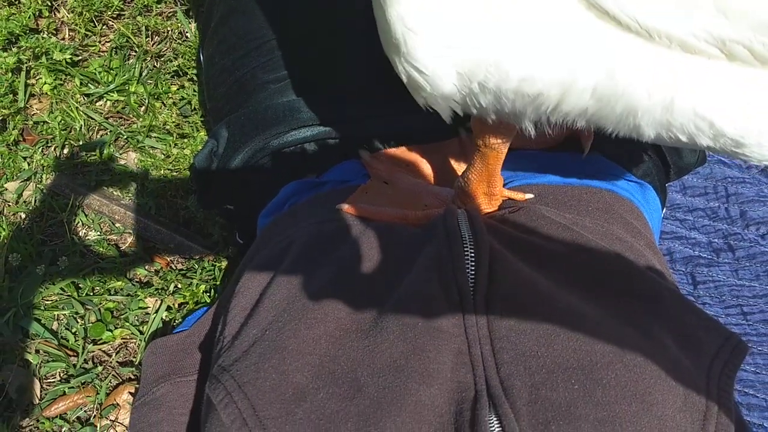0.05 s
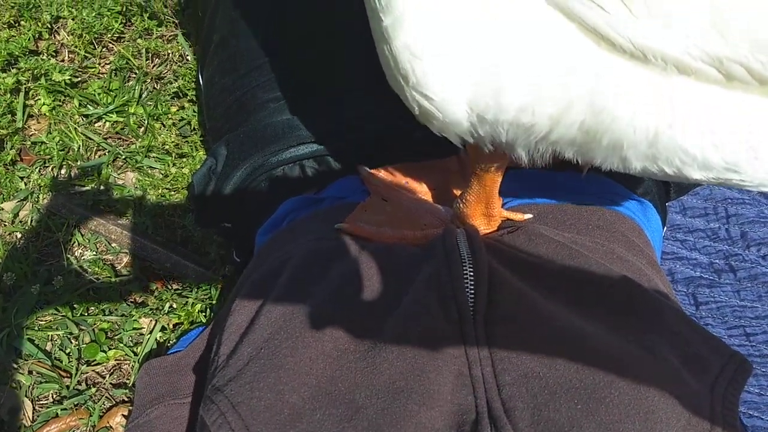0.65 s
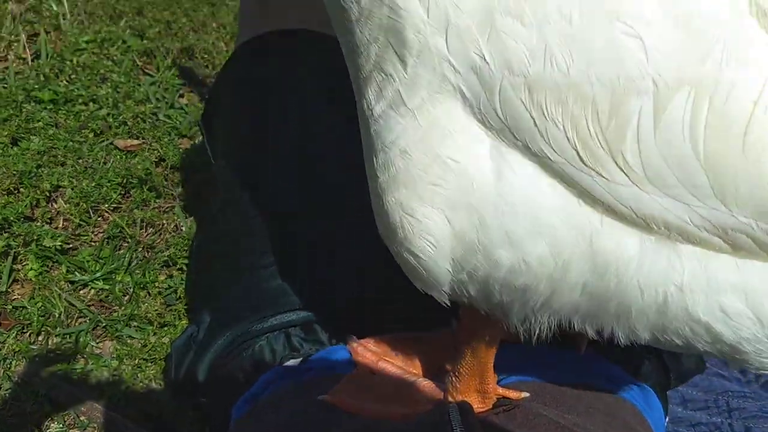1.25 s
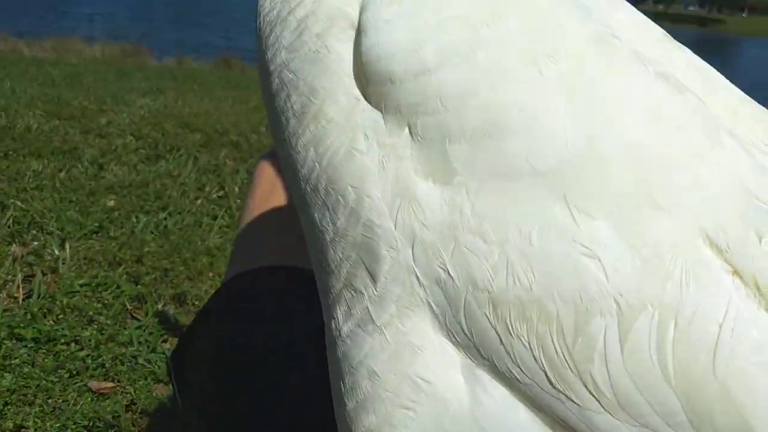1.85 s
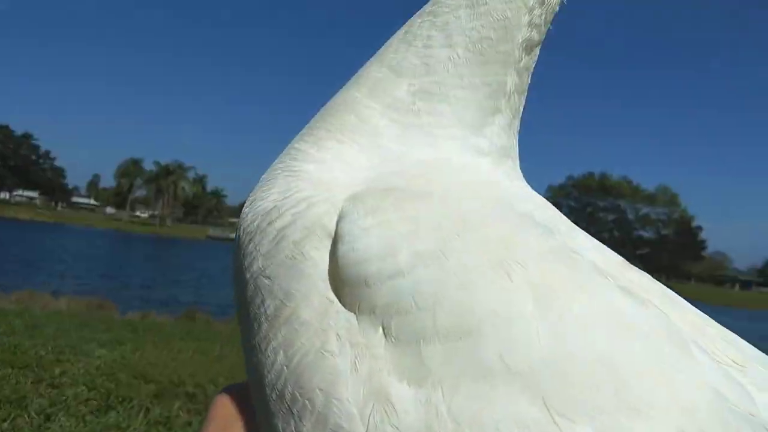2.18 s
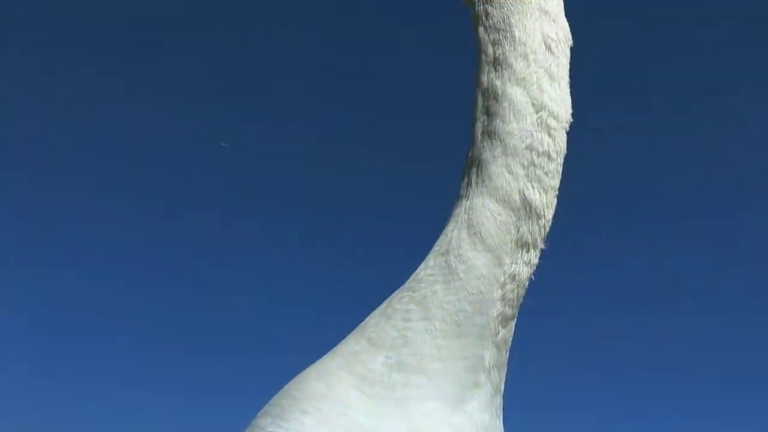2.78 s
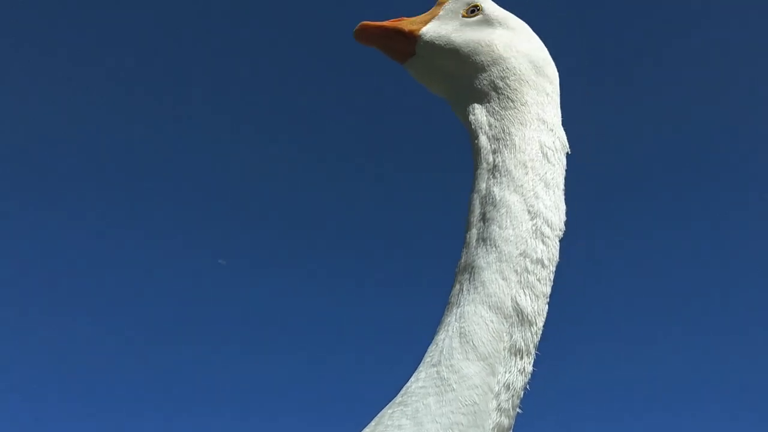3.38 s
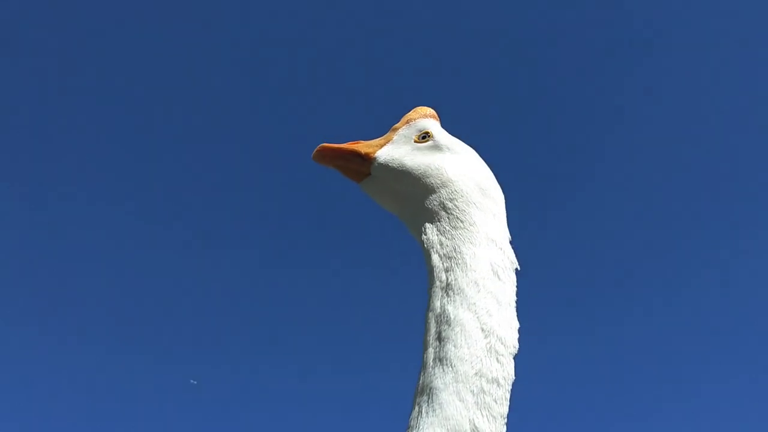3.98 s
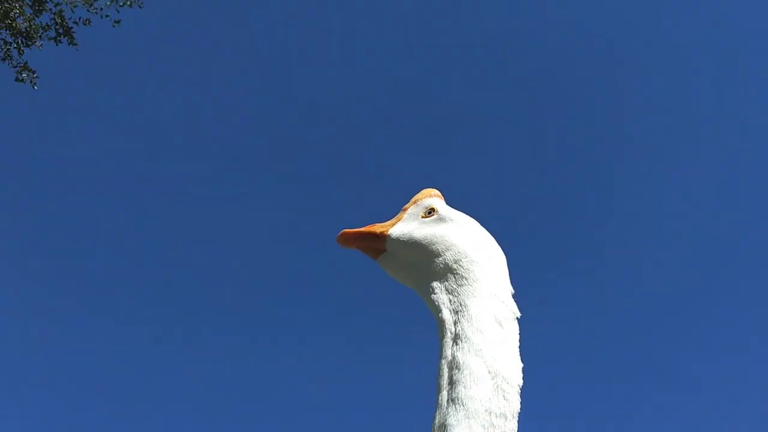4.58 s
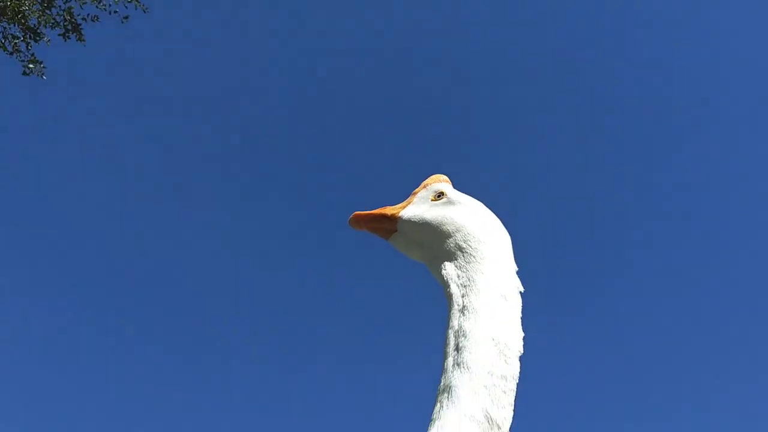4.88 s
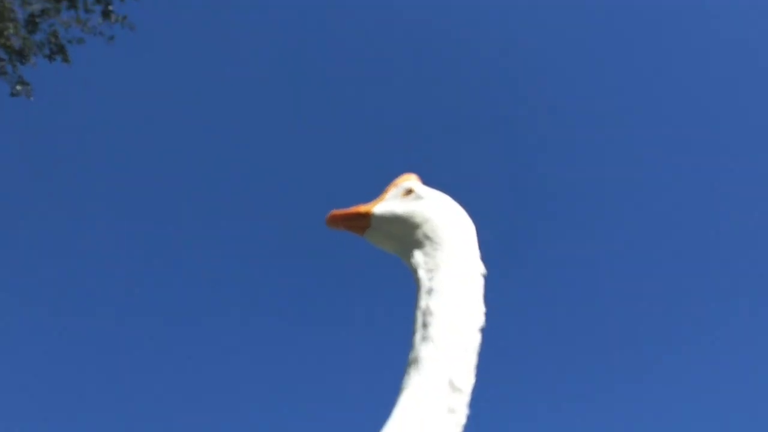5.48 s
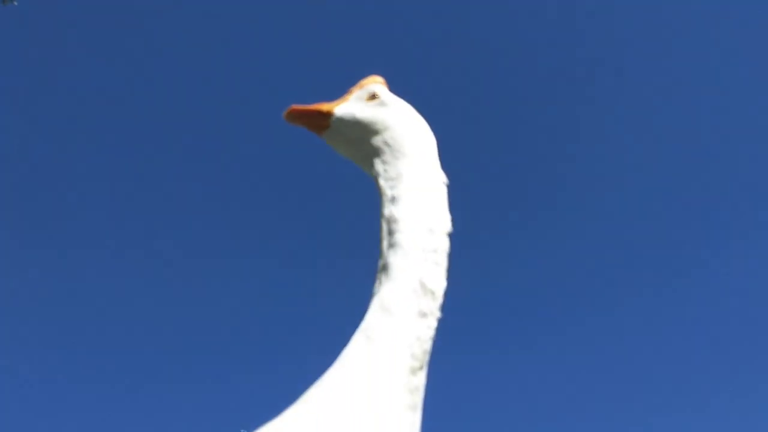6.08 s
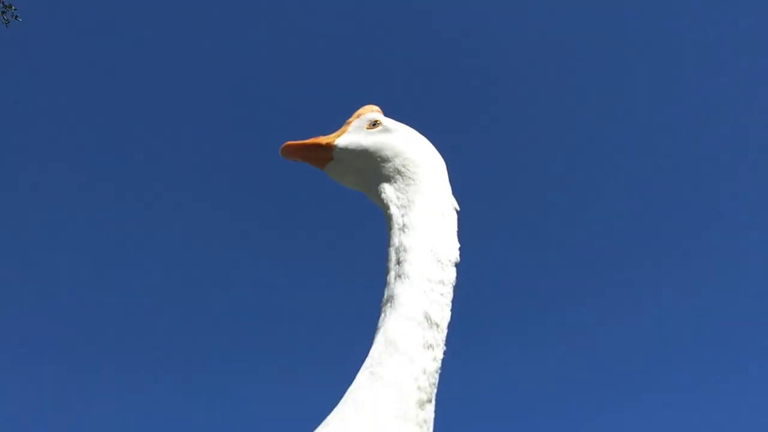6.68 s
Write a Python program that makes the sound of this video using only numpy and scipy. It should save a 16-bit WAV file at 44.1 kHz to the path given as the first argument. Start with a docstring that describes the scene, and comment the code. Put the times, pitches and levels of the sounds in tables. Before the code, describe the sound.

Outdoors in the open, a goose very close to a hand-held microphone gives five loud, evenly spaced honks. They are short, shrill and raspy, each starting gruffly, holding a high squeal and then breaking downward. Low, uneven wind buffeting and a faint hiss of air run underneath, easing briefly midway. One small, dry tick on the microphone falls between the first two calls.

```python
"""Goose honking in gusty wind

A domestic goose honks five times at arm's length, outdoors; the first honk is already under way.
Membranes in its syrinx slap out a rough bark, jump to a held, beating squeal, swoop to a crest and
tumble through lower registers, over a rasp of forced air. Wind buffets mainly one port of a
microphone pair, and something ticks once against the hand-held camera."""
import sys
import numpy as np
from scipy import signal
from scipy.fft import rfft, irfft, next_fast_len
from scipy.io import wavfile
from scipy.ndimage import uniform_filter1d

SR = 44100
rng = np.random.default_rng(int(sys.argv[2]) if len(sys.argv) > 2 else 0)


def pcm_store(signal):
    """Save signal as 16-bit PCM."""
    levels = np.round(np.clip(np.atleast_2d(signal), -1, 1) * 32767)
    wavfile.write(sys.argv[1], SR, levels.astype(np.int16).T)


N = 297234
TIME = np.arange(N) / SR
BAND_LIMIT_HZ = 15830

# honks: start/s, crest/s, yelp/s, end/s, opening effort/dB, squeal effort/dB, fall effort/dB,
# squeal pitch/Hz, brightness/(dB/octave), nasal ring/Hz
HONKS = [(-.29, .066, .118, .24, 0, -2, 2, 1421, -2, 3230),
         (1.17, 1.516, 1.573, 1.70, -1.5, -6, -1.5, 1431, -1.5, 3380),
         (2.589, 2.949, 3.006, 3.113, -1, -3.5, -2, 1422, 0, 3200),
         (4.149, 4.514, 4.579, 4.695, -.5, 0, -2.5, 1415, 1, 3150),
         (5.813, 6.197, 6.256, 6.37, 2, 1.5, -0.5, 1408, -1, 3130)]
# opening bark of the typical honk: length/s, level/dB, first pulse rate/Hz, last pulse rate/Hz
BARK = (.066, -12.5, 137.5, 159)
# register contours of the typical honk: t/s, pitch/Hz, level/dB
STEP = [(.053, 1156, -20), (.08, 1164, -12.5), (.107, 1215, -18.5)]
HOLD = [(.103, 1.006, -18.5), (.115, 1, -12.5), (.2, .998, -11), (.315, 1.01, -14.5), (.338, 1.028, -10.5),
        (.37, 1.045, -26)]  # pitch as a ratio to the honk's squeal pitch
SWOOP = [(.322, 1433, -25), (.345, 1542, -16.5), (.363, 1737, -24.5)]
CREST = [(.34, 1718, -22), (.359, 1764, -14), (.385, 1768, -31)]
BREAK = [(.353, 880, -36.5), (.371, 878, -13), (.388, 830, -29)]
LOW = [(.372, 715.5, -25), (.397, 670, -18), (.42, 661, -28.5)]
YELP = [(.418, 1177, -19), (.442, 1135, -23.5), (.487, 1067, -36)]
SIGH = [(.472, 907, -31.5), (.497, 881, -28), (.533, 805, -40)]
# wind strength: t/s, level/dB
WIND_STRENGTH = [(0.0, -20), (0.12, -25.5), (0.4, -16), (0.52, -28), (0.64, -20), (1.04, -30),
                 (1.12, -17.5), (1.28, -25.5), (1.68, -21), (2.0, -32), (2.12, -22), (2.76, -22),
                 (2.84, -31), (3.12, -31), (3.2, -51), (3.32, -32.5), (3.48, -37.5), (4.04, -20),
                 (4.2, -30), (4.72, -20), (4.96, -28.8), (5.32, -22), (6.2, -26.5), (6.72, -25.5)]
# turbulence spectrum: f/Hz, level/dB
RUMBLE_SPECTRUM = [(20, -37), (35, -10), (60, 4.5), (100, 0.5), (160, -1.5), (250, -9), (400, -17.5),
                   (600, -34), (900, -43), (2000, -74)]


def goose(tone_db=-2.5, rasp_db=-6.5, waver_db=1.37):
    """Each honk is a bark, then a run through the syrinx's registers with a rasp of air."""
    # contour, beat rate/pitch, beat depth/rad, jitter/pitch, undertone/pitch, undertone level/dB,
    # slope past the listed harmonics/(dB/octave), harmonic levels/dB
    registers = [ (STEP, .13, 0.12, 0.0038, .39, -26.5, -33, [4, -8, -18.5, -30, -36, -49.5]),
                 (HOLD, .195, .38, .0032, .54, -27, -12, [0, -8, -16.5, -27, -35, -42]),
                 (SWOOP, 0.14, .14, 0.0055, 0.36, -28, -15, [-9, -4, -17.5, -13.5, -18, -25.5]),
                 (CREST, 0.22, 0.21, 0.0021, 0.37, -21.5, -17.5, [3.5, -9, -12.5, -17.5, -39, -38]),
                 (BREAK, .22, 0.086, 0.0087, 1, -15, -33.5, [-0.5, -5.5, -10.5, -23.5, -38.5, -29.5]),
                 (LOW, .165, 0.11, 0.0059, 0.31, -36.5, -16, [3, 1.5, 0, -16, -11.5, -6.5, -51.5, -21]),
                 (YELP, 0.26, 0.14, 0.013, 0.6, -19.5, -32, [3.5, 5, -16, -33.5, -25, -27]),
                 (SIGH, 0.34, 0.08, 0.0098, 0.56, -25.5, -8, [7, -7.5, -15, -17.5, -26, -40])]
    tones, barks = np.zeros((2, N))
    bark_s, bark_db, *rates_hz = BARK
    for honk in HONKS:
        start_s, _, _, _, opening_db, _, _, squeal_hz, bright_db, _ = honk
        bark_end_s, _ = stretch(honk, bark_s)
        add(barks, *bark(start_s, bark_end_s, bark_db + opening_db, *rates_hz))
        for contour, *voice in registers:
            typical_s, pitch, db = np.transpose(contour)
            times_s, effort_db = stretch(honk, typical_s)
            hz = pitch * squeal_hz if contour == HOLD else pitch
            add(tones, *syrinx(times_s, hz, db + effort_db, bright_db, *voice))
    breath = gain_of(rasp_db) * rasp(tones)
    nasal_hz = np.interp(TIME, [honk[1] for honk in HONKS], [honk[-1] for honk in HONKS])
    tones = tones + 1.23 * resonate(tones, nasal_hz, width_hz=240)  # ring of the open bill
    pressure = gain_of(waver_db * wander(N, 18))
    return pressure * (gain_of(tone_db) * tones + breath) + barks


def stretch(honk, typical_s, squeal_s=(.11, .32), crest_s=.36, yelp_s=.418, end_s=.536):
    """Maps moments of the typical honk to this honk's times/s and efforts/dB."""
    opening_db, squeal_db, fall_db = honk[4:7]
    effort_db = np.interp(typical_s, (BARK[0], *squeal_s, crest_s),
                          (opening_db, squeal_db, squeal_db, fall_db))
    return np.interp(typical_s, (0, crest_s, yelp_s, end_s), honk[:4]), effort_db


def syrinx(times_s, hz, db, bright_db, beat_ratio, depth_rad, jitter, under_ratio, under_db,
           slope_db, harmonics_db, shimmer_db=1.5, tension_db=1.5):
    """One membrane sets the pitch; a second vibration beats against it, adding sidebands."""
    edge_s = .012
    t = np.arange(times_s[0] - edge_s / 2, times_s[-1] + edge_s / 2, 1 / SR)
    n = len(t)
    pitch_hz = np.interp(t, times_s, hz)
    tension = np.tanh((pitch_hz / np.median(pitch_hz) - 1) / .03)
    tilt_db = bright_db + tension_db * tension  # tighter is higher and brighter
    beat_phase = 2 * np.pi * np.cumsum(beat_ratio * pitch_hz * (1 + .03 * wander(n, 90))) / SR
    phase = 2 * np.pi * np.cumsum(pitch_hz * (1 + jitter * wander(n, 260))) / SR
    swing_rad = depth_rad * (1 + .35 * wander(n, 30))
    under_gain = gain_of(under_db + 7.26 * wander(n, 22))
    tone = under_gain * np.cos(under_ratio * phase + .5 * wander(n, 55))
    phase = phase + swing_rad * np.sin(beat_phase)
    for k in range(1, int(BAND_LIMIT_HZ / hz.max()) + 1):
        listed = min(k, len(harmonics_db))
        level_db = harmonics_db[listed - 1] + slope_db * np.log2(k / listed) + tilt_db * np.log2(k)
        angle = k * phase + 2 * np.pi * rng.random()
        upper_sideband = .27 * swing_rad * np.cos(angle + 2 * beat_phase)
        tone += gain_of(level_db) * (np.cos(angle) + upper_sideband)
    level = gain_of(np.interp(t, times_s, db) + shimmer_db * wander(n, 180))
    beating = 1 - .21 * swing_rad * np.cos(beat_phase)
    return t[0], np.sqrt(2) * level * beating * tone * fade(t, times_s[0], times_s[-1], edge_s)


def bark(start_s, end_s, db, first_hz, last_hz, jitter=.05, roughness=.4, easing_db=4):
    """Slack membranes slap irregularly into the windpipe; as they tighten, slaps grow in between."""
    # throat during a bark: f/Hz, level/dB
    throat = [(250, -24), (450, -7.5), (600, -1.5), (750, -8), (900, 3), (1080, -5), (1350, -0.5),
              (1650, -6.5), (2200, -8.5), (2800, -12), (4200, -30.5), (7500, -41), (10000, -72),
              (15000, -74.5)]
    t = np.arange(start_s, end_s + .0051, 1 / SR)
    n = len(t)
    tension = np.clip((t - start_s) / (end_s - start_s), 0, 1)
    rate_hz = (first_hz + (last_hz - first_hz) * tension) * (1 + jitter * wander(n, 120))
    cycles = np.cumsum(rate_hz) / SR
    half_cycle = np.floor(2 * cycles)
    slaps = np.diff(half_cycle, prepend=-1) * np.where(half_cycle % 2, -.5 * tension, 1)
    slaps *= gain_of(1.3 * wander(n, 200))
    puffs = (.23 + np.exp(-(cycles % 1) / .44)) * rng.standard_normal(n)
    source = unit_rms(slaps) + roughness * unit_rms(puffs)
    voice = windpipe(colour(source, throat), reflection=.31)
    ring_hz = 920 + 280 * tension  # rises as the bill opens
    voice = unit_rms(voice + 1.3 * resonate(voice, ring_hz, width_hz=190))
    voice = unit_rms(voice / (1 + abs(signal.hilbert(voice)) ** 2) ** .34)  # strong slaps saturate
    level = gain_of(db + easing_db * (.5 - tension))
    return start_s, level * voice * fade(t, start_s + .0052, end_s - .004, edge_s=.019)


def rasp(tones, pulsing=.58, effort_share=.57):
    """Air forced through the syrinx, chopped by its vibration."""
    # airflow in the typical honk: t/s, treble level/dB
    flow = [(0, -60.5), (.007, -35), (.07, -31), (.2, -30), (.32, -34.5), (.355, -37.5), (.39, -39),
            (.46, -40.5), (.51, -62), (.536, -84.5)]
    # throat, bill wide open: f/Hz, level/dB
    throat = [(300, -14.5), (600, -14), (950, 3), (1300, -6.5), (1700, 4), (2200, -5.5), (2800, 1.5),
              (3300, 2.5), (4200, -8), (5200, -14), (6200, -12.5), (8800, -28.5), (11000, -33),
              (15000, -33.5)]
    typical_s, db = np.transpose(flow)
    airflow = np.zeros(N)
    for honk in HONKS:
        times_s, effort_db = stretch(honk, typical_s)
        flow_db = np.interp(TIME, times_s, db + effort_share * effort_db, left=-np.inf, right=-np.inf)
        airflow += gain_of(flow_db)
    opening = tones / np.sqrt(abs(uniform_filter1d(tones ** 2, size=200)) + 1e-6)
    air = rng.standard_normal(N) * (1 + pulsing * opening) * gain_of(1.8 * wander(N, 250))
    return airflow * colour(windpipe(air, reflection=.35), throat, band_hz=(4400, 12000))


def windpipe(x, reflection, lowest_hz=150.8):
    """Tube open at one end: waves return inverted, so odd multiples of lowest_hz resonate."""
    hz = np.fft.rfftfreq(2 * len(x), 1 / SR)
    echo = reflection * np.exp(-1j * np.pi * hz / lowest_hz)
    return unit_rms(irfft(rfft(x, 2 * len(x)) / (1 + echo))[:len(x)])


def ground_scatter(x, scatter_db=-36, t60_s=.27):
    """Open ground scatters a little sound back, dulled."""
    t = TIME[:SR // 2]
    echoes = sparse_clicks(len(t), per_s=2000) * gain_of(-60 * t / t60_s) * (t > .004)
    echoes = gain_of(scatter_db) * echoes / np.linalg.norm(echoes)
    return signal.oaconvolve(x, signal.lfilter([.4], [1, -.6], echoes))[:N]


def wind(rumble_db=4, lumps_db=3, gusts_db=1.1, pops_db=-13, buffet_db=7, shove=9, overload=.8):
    """Gusts of lumpy turbulence; each buffet is a shove and a swirl. The strongest overload the port."""
    # eddies hitting the port: t/s, relative level/dB, swirl time/s, upper edge/Hz
    buffets = [(.281, -12, 0.0027, 1490), (.313, -15.5, 0.004, 600), (0.364, -15, .005, 150),
               (.403, -11.5, 0.0035, 900), (.469, -21, 0.0019, 1500), (.648, -14, 0.0061, 700),
               (.89, -15, 0.0025, 180), (.916, -17.5, 0.0014, 2500), (1.091, -12, 0.0028, 2500),
               (1.127, -14, .004, 181.5), (1.374, -12.5, 0.0042, 1500), (1.696, -10.5, 0.0036, 1000),
               (1.803, -23, .005, 900), (2.134, -16.5, 0.0043, 400), (2.28, -16.5, 0.0047, 200),
               (2.358, -13, .003, 180), (2.386, -11.5, .003, 500), (2.556, -16, 0.0033, 250),
               (2.756, -19.5, .005, 1000), (3.371, -18, 0.0037, 700), (4.02, -14.5, 0.0028, 400),
               (4.059, -14, .006, 1400), (5.35, -15.5, 0.0053, 181), (5.475, -14.5, 0.0035, 200),
               (6.371, -22, .005, 700)]
    # eddy spectrum: f/Hz, level/dB
    eddy = [(30, -26), (80, 5.5), (180, 0.5), (350, -7), (550, -11.5), (800, -26.5), (1300, -48),
            (2500, -52), (6000, -87.5)]
    strength = level_curve(WIND_STRENGTH) * unit_rms(gain_of(gusts_db * wander(N, 9)))
    lumps = unit_rms(gain_of(lumps_db * wander(N, 33)))
    rumble = lumps * colour(rng.standard_normal(N), RUMBLE_SPECTRUM)
    pops = unit_rms(colour(sparse_clicks(N, per_s=90), eddy))  # small eddies flick the port
    rumble = strength * (rumble + gain_of(pops_db) * pops)
    eddies = np.zeros(N)
    for at_s, db, swirl_s, top_hz in buffets:
        age = TIME[:SR // 12] / swirl_s
        swirl = rng.standard_normal(len(age)) * age * np.exp(-age)
        add(swirl, .004, shove * rng.choice([-1, 1], size=1))
        burst = signal.lfilter(*signal.butter(2, top_hz, fs=SR), colour(swirl, eddy))
        peak_rms = np.sqrt(uniform_filter1d(burst ** 2, size=220).max())
        add(eddies, at_s - .003, gain_of(db) * burst / peak_rms)
    pressure = gain_of(rumble_db) * rumble + gain_of(buffet_db) * eddies
    return overload * np.tanh(pressure / overload)


def tick(at_s=.7365, db=-21.5):
    """A small hard knock on the camera body, without ring."""
    # knock spectrum: f/Hz, level/dB
    spectrum = [(100, -26), (600, 7.5), (1200, -2), (2500, -7.5), (4500, -18), (8000, -33), (15000, -50)]
    blow = np.zeros(N)
    blow[round(at_s * SR)] = gain_of(db) * np.sqrt(SR / 200)  # db as rms over 5 ms
    return colour(blow, spectrum)


def hiss(db=-1, flicker_db=.68):
    """Air streaming past the port."""
    # airstream: t/s, treble level/dB
    stream = [(0.5, -66.5), (0.95, -62), (1.85, -66.5), (2.25, -64.5), (3.25, -65.5), (3.55, -64),
              (3.9, -59), (4.85, -63), (5.2, -61), (5.65, -56), (6.6, -63)]
    # hiss spectrum: f/Hz, level/dB
    spectrum = [(200, -2), (800, 1.5), (1400, -1), (2200, -8), (3500, -13), (6000, -18.5), (10000, -24.5),
                (15000, -33)]
    air = colour(rng.standard_normal(N), spectrum, band_hz=(2500, 12000))
    return level_curve(stream) * gain_of(db + flicker_db * wander(N, 8.2)) * air


def mic_pair(x, balance=((1, 0),), lead=((1, 0),), lag_s=.000435):
    """The right channel is inverted and late; direction colours the two differently."""
    size = next_fast_len(N + SR // 10)
    hz = np.fft.rfftfreq(size, 1 / SR)
    left = gain_of(at_hz(balance, hz))
    right = -np.exp(-1j * (2 * np.pi * hz * lag_s + at_hz(lead, hz)))
    response = np.array([left, right]) * np.sqrt(2 / (1 + left ** 2))
    return irfft(response * rfft(x, size), size)[:, :N]


def gain_of(db):
    """Decibels to amplitude."""
    return 10 ** (np.asarray(db) / 20)


def unit_rms(x):
    """Scales to rms 1."""
    return x / np.sqrt(np.mean(x ** 2) + 1e-20)


def at_hz(points, hz):
    """Interpolates a table on a log-frequency axis."""
    f, value = np.transpose(points)
    return np.interp(np.log(hz + 1), np.log(f + 1), value)


def level_curve(points):
    """Rows of t/s, level/dB to a gain per sample."""
    return gain_of(np.interp(TIME, *np.transpose(points)))


def add(mix, at_s, sound):
    """Mixes a sound in, cutting what falls outside."""
    at = round(at_s * SR)
    sound = sound[max(0, -at):]
    part = mix[max(0, at):][:len(sound)]
    part += sound[:len(part)]


def sparse_clicks(n, per_s):
    """Impulses of random time and size."""
    return rng.standard_normal(n) * (rng.random(n) < per_s / SR)


def wander(n, hz):
    """Smooth random drift, rms about 1, up to about hz."""
    size = SR * 8 if n > SR // 2 else SR // 2
    lowpass = 1 + (np.fft.rfftfreq(size, 1 / SR) / hz) ** 4
    return unit_rms(irfft(rfft(rng.standard_normal(size)) / lowpass))[:n]


def colour(x, spectrum, band_hz=(0, SR), size=4096):
    """Minimum-phase filter; unit white noise comes out at rms 1 inside the band."""
    hz = abs(np.fft.fftfreq(size, 1 / SR))
    gain = gain_of(at_hz(spectrum, hz))
    gain /= np.sqrt(np.mean(gain ** 2 * (hz >= band_hz[0]) * (hz <= band_hz[1])))
    taps = np.fft.ifft(np.exp(np.conj(signal.hilbert(np.log(gain))))).real
    return signal.oaconvolve(x, taps[:size // 2])[:len(x)]


def resonate(x, hz, width_hz):
    """Moving resonance of gain 1: shifts the curve hz to zero, smooths, shifts back."""
    carrier = np.exp(2j * np.pi * np.cumsum(hz) / SR)
    pole = np.exp(-np.pi * width_hz / SR)
    return 2 * (carrier * signal.lfilter([1 - pole], [1, -pole], x / carrier + 1e-18)).real


def fade(t, start_s, end_s, edge_s):
    """Gate with smooth edges centred on start and end."""
    inside_s = np.minimum(t - start_s, end_s - t)
    return np.sin(np.pi / 2 * np.clip(inside_s / edge_s + .5, 0, 1)) ** 2


def scene(far_port_db=-12, wide_hiss_db=-9):
    """Goose in front; wind mostly on one port, a little on the other."""
    # goose at the pair: f/Hz, left minus right/dB
    balance = [(700, 2), (1150, -.5), (1430, -3.5), (1720, -19), (2000, -5), (2250, 0), (2850, 0),
               (3080, 7), (3450, 0), (3850, -6), (4500, 0), (5150, -6), (6300, 4), (6900, 0)]
    # goose at the pair: f/Hz, extra left lead/rad
    lead = [(600, 1.3), (1000, .4), (1400, -.5), (1600, -1.4), (1750, 1.5), (1900, 1.1), (2300, 0),
            (3700, .1), (4000, .9), (4600, 0)]
    honks = goose()
    far_rumble = colour(rng.standard_normal(N), RUMBLE_SPECTRUM)
    far_port = gain_of(far_port_db) * level_curve(WIND_STRENGTH) * far_rumble
    around = np.array([ground_scatter(honks) + gain_of(wide_hiss_db) * hiss() for _ in range(2)])
    near_port = wind() + tick() + hiss()
    return mic_pair(honks, balance, lead) + mic_pair(near_port) + mic_pair(far_port)[::-1] + around


def record(dry):
    """Rounds off peaks at full scale, then limits the band."""
    limited = dry / (1 + dry ** 8) ** (1 / 8)
    lowpass = signal.firwin(511, BAND_LIMIT_HZ, window=("kaiser", 9), fs=SR)
    return signal.oaconvolve(limited, lowpass[None], "same")


dry = scene()
out = record(dry)
pcm_store(out)
```